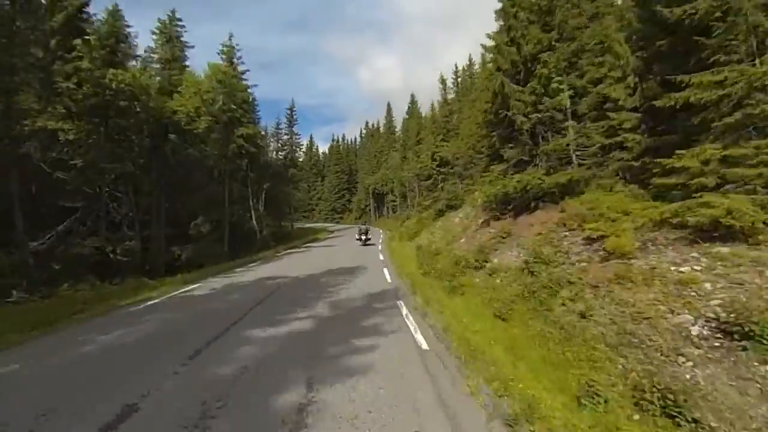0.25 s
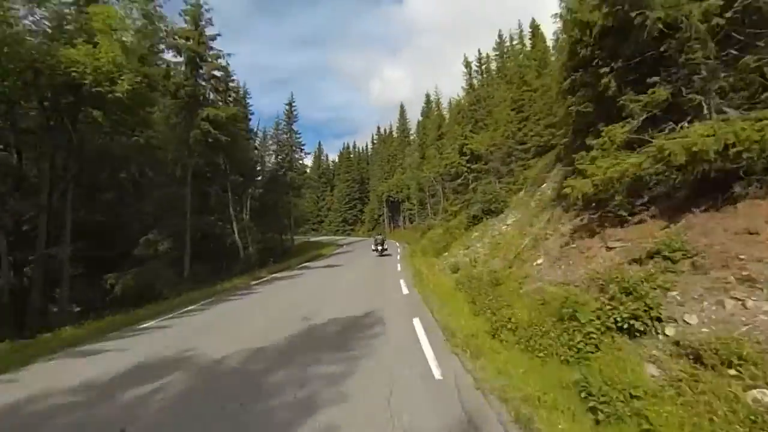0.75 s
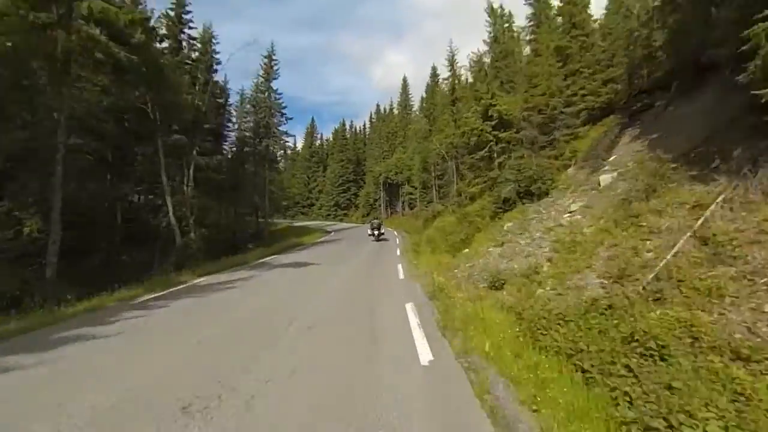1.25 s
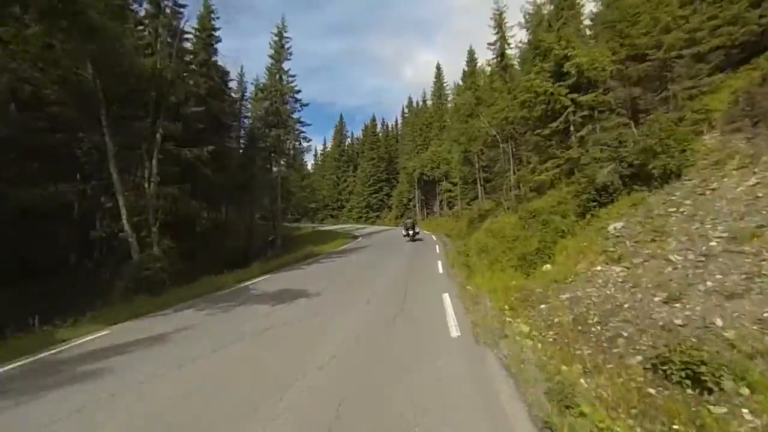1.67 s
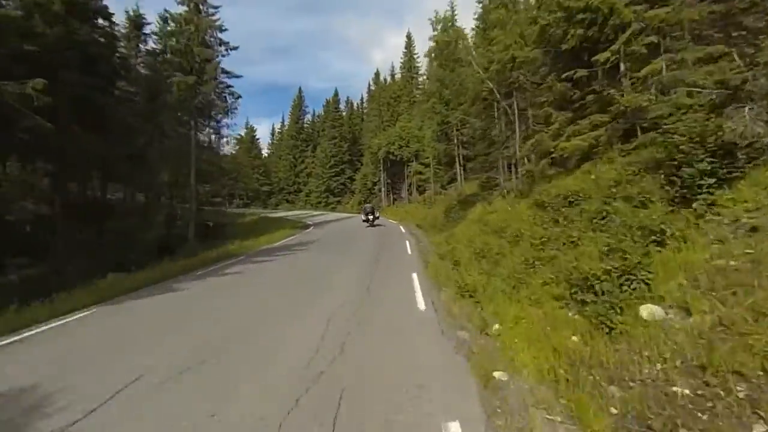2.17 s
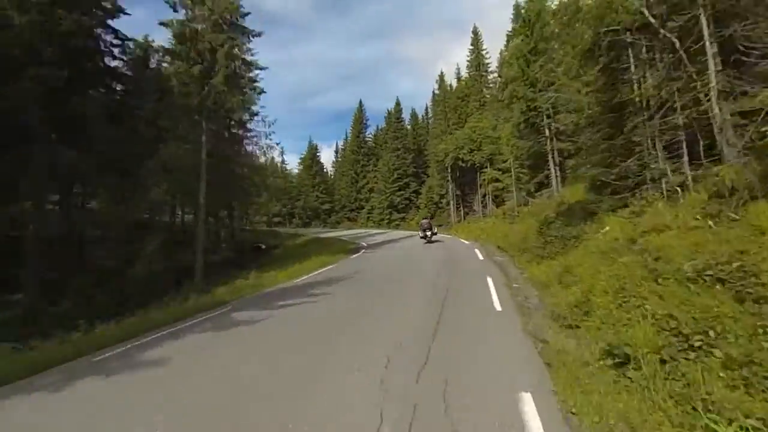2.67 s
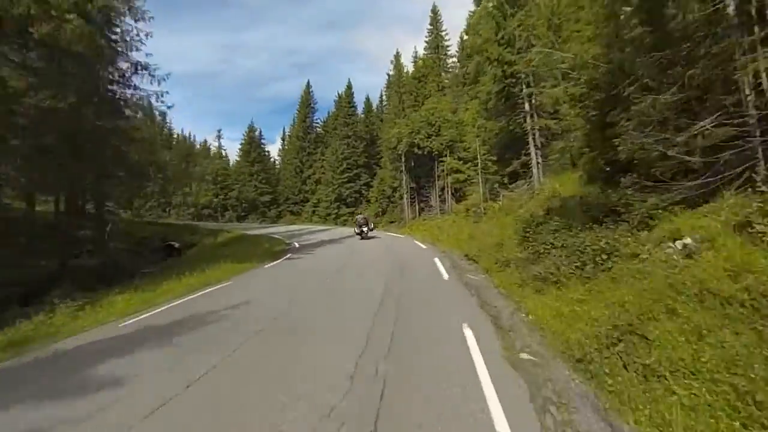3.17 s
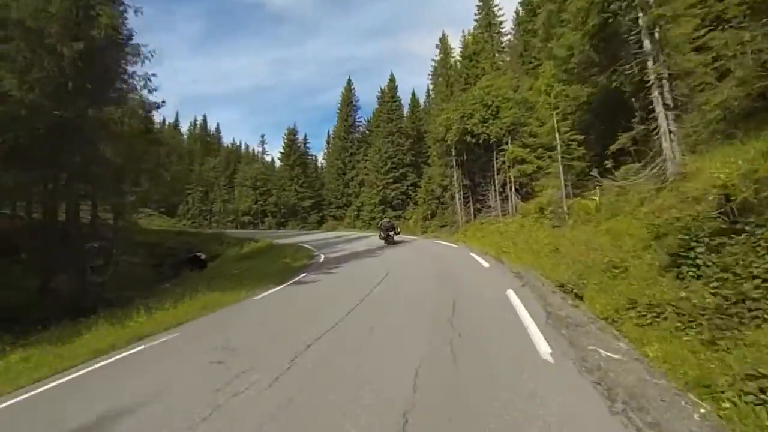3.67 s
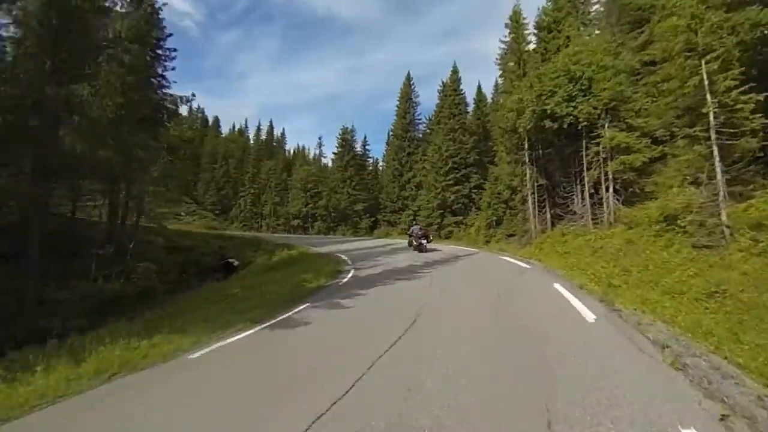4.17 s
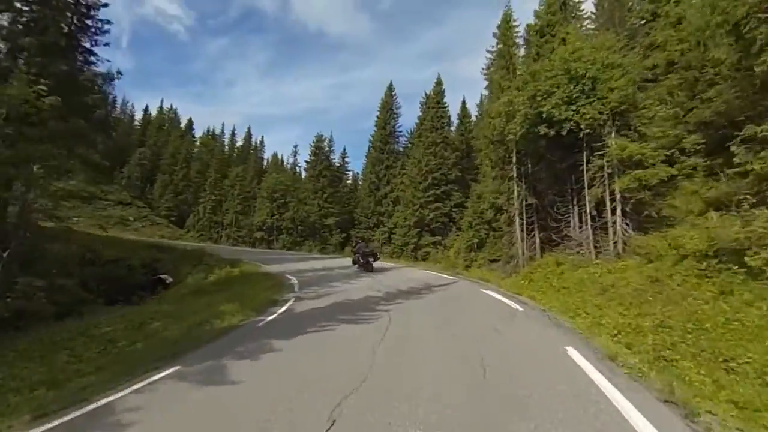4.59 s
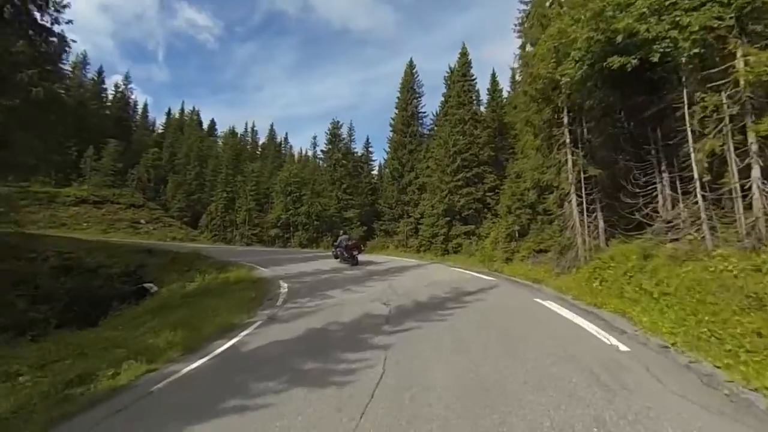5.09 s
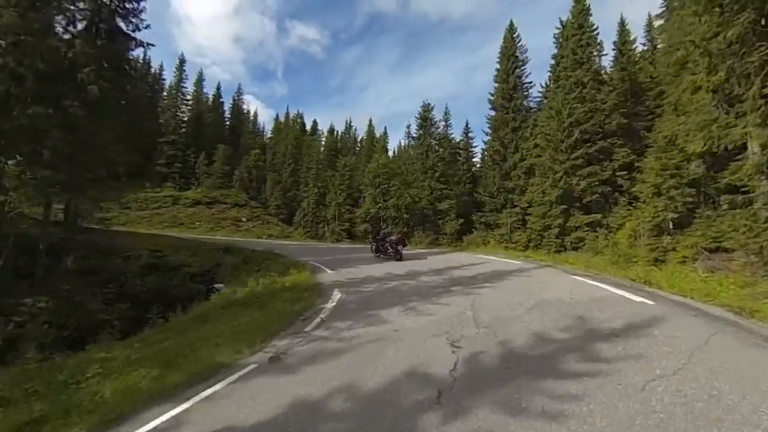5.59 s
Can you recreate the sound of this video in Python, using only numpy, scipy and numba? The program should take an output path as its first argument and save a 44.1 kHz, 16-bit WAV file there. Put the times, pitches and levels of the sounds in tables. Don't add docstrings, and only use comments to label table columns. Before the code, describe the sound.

Loud buffeting headwind on a moving motorcycle dies down over six seconds, leaving a falling engine drone, rough chain whine and faint hiss.

```python
import sys
import numpy as np
from scipy import signal
from scipy.fft import rfft, irfft
from scipy.io import wavfile
from scipy.ndimage import uniform_filter1d
from numba import njit

SR = 44100
rng = np.random.default_rng(int(sys.argv[2]) if len(sys.argv) > 2 else 0)


def voltage_ratio(decibels):
    exponent = np.asarray(decibels, float) / 20
    return 10 ** exponent


def wrap_up_sound(samples):
    columns = np.atleast_2d(samples).T
    tamed = np.clip(columns, -1, 1)
    steps = np.round(tamed * 32767).astype(np.int16)
    wavfile.write(sys.argv[1], SR, steps)


N = 257103
T = np.arange(N) / SR

# f/Hz, width/Hz, level/dB
CASE_PEAKS = [(741, 134, 6), (2383, 81, 5), (3040, 136, 6.5), (3490, 120, 4), (4770, 100, 3.5),
              (5150, 730, 3), (7500, 1300, 4.5)]


def level(x, db):
    return x * voltage_ratio(db) / np.sqrt(np.mean(x ** 2))


def curves(table):
    s, *columns = np.transpose(table)
    return [np.interp(T, s, column) for column in columns]


def walk(rate_hz):
    hold = int(SR / rate_hz)
    steps = np.repeat(rng.standard_normal(N // hold + 1), hold)
    slewed = uniform_filter1d(uniform_filter1d(steps, hold), hold)
    return 1.3 * slewed[:N]


def noise(spectrum, peaks=(), drive=1):
    hz = np.arange(N // 2 + 1) * SR / N + 1e-3
    points = np.array(spectrum)
    db = np.interp(np.log(hz), np.log(points[:, 0]), points[:, 1])
    for peak_hz, width_hz, peak_db in peaks:
        db = db + peak_db / (1 + (2 * (hz - peak_hz) / width_hz) ** 2)
    white = drive * rng.standard_normal(N)
    return level(irfft(rfft(white) * voltage_ratio(db), N), 0)


@njit
def svf(x, hz, width):
    out, band, low = np.empty(len(x)), 0., 0.
    for i in range(len(x)):
        g, k = np.tan(np.pi * hz[i] / SR), width / hz[i]
        v = (band + g * (x[i] - low)) / (1 + g * (g + k))
        band, low, out[i] = 2 * v - band, low + 2 * g * v, k * v
    return out


def resonate(x, hz, width_hz, db):
    width_hz = float(width_hz)
    return level(svf(svf(x, hz, width_hz), hz, width_hz), db)


def wind_buffet(eddy_db):
    # f/Hz, density/dB per Hz
    buffet_spectrum = [(8, -21), (30, 7), (55, -1), (70, -3.5), (100, -0.5), (210, -1.5), (280, -8),
                       (302, -20), (420, -26), (700, -87.5)]
    thumps = level(noise(buffet_spectrum), 2.65) * voltage_ratio(.5 * walk(6.1))
    return thumps * voltage_ratio(-25.5 + eddy_db)


def wind_stream(head_db):
    # f/Hz, density/dB per Hz
    roar_spectrum = [(200, -29.5), (320, -19.5), (500, -16.5), (1000, -18.5), (1350, -2), (1650, -12.5),
                     (2000, -16.5), (3700, -29.5), (4100, -34), (5800, -33), (6100, -40), (8000, -47.5),
                     (8600, -52.5), (14500, -61)]
    stream = level(noise(roar_spectrum, CASE_PEAKS, voltage_ratio(0.81 * walk(40))), 20.5)
    treble = svf(stream, np.full(N, 8500.), 5900.0)
    stream = stream + (voltage_ratio(6.0 - 3.1 * T) - 1) * treble
    calm_db = uniform_filter1d(head_db, size=SR // 4, mode="nearest")
    return stream * voltage_ratio(-51 + .98 * calm_db)


def wind_rush(head_db, cross):
    # f/Hz, density/dB per Hz
    rush_spectrum = [(900, -25.5), (1200, -6.5), (1700, -4.5), (2100, -8), (2600, -9), (2800, -15),
                     (3700, -15), (4100, -27.5), (5600, -34.5), (8000, -79)]
    rush = level(noise(rush_spectrum, CASE_PEAKS, voltage_ratio(1.24 * walk(45))), 0.91)
    return rush * np.hypot(voltage_ratio(-40 + 0.96 * head_db), cross)


def case_roar(head_db, cross):
    # f/Hz, width/Hz, level/dB
    air_modes = [(1351, 270, -3.5), (1580, 224, -9)]
    ring = 0
    for mode_hz, width_hz, db in air_modes:
        centre_hz = mode_hz * (1 + 0.01 * walk(4.09))
        mode = resonate(rng.standard_normal(N), centre_hz, width_hz, db)
        ring = ring + mode * voltage_ratio(1.13 * walk(30))
    head = voltage_ratio(-24.5 + head_db + 0.82 * walk(12))
    return ring * np.hypot(head, voltage_ratio(6.5) * cross)


def steady_hiss():
    # f/Hz, density/dB per Hz
    hiss_spectrum = [(200, -6.5), (320, -6), (500, -17.5), (950, -21), (1300, -24), (1800, -7), (2700, -37),
                     (3800, -30), (4200, -34.5), (5500, -52), (7200, -39), (9000, -42), (12000, -52.5),
                     (15000, -57)]
    return level(noise(hiss_spectrum, CASE_PEAKS), -52.0)


def engine():
    # t/s, rate/engine cycles per s
    cycle_rate = [(0, 34), (2.2, 27.3), (3, 23.8), (3.5, 21.8), (4, 20.5), (4.5, 19.8), (5, 18.9),
                  (5.83, 17.4)]
    # t/s, fourth order level/dB, sixth order level/dB
    order_levels = [(0, -59, -63), (1.8, -34, -54), (2.2, -36.5, -59), (2.9, -36, -67), (3.4, -47.5, -53.5),
                    (3.8, -47, -46), (4.2, -45.5, -42), (5, -44.5, -42), (5.83, -47, -42)]
    # order, level/dB over the fourth
    low_orders = [(2, -38), (3, -3), (4, -2.5), (5, -8)]
    # order, level/dB over the sixth
    high_orders = [(6, -0.5), (7, -12), (10, -19.5), (12, -18)]
    turn = 2 * np.pi * np.cumsum(curves(cycle_rate)[0]) / SR
    low_db, high_db = curves(order_levels)
    out = 0
    for orders, db in ((low_orders, low_db), (high_orders, high_db)):
        for order, rel_db in orders:
            start = 2 * np.pi * rng.random()
            gain = np.sqrt(2) * voltage_ratio(db + rel_db + 1.2 * walk(5.1))
            out = out + gain * np.sin(order * turn + start + .12 * walk(9))
    return out


def driveline_whine():
    # t/s, tooth rate f/Hz, level/dB
    tooth_rate = [(0, 820, -61), (2.4, 824, -50.5), (3.3, 819, -51), (3.75, 813, -44), (4, 792, -45),
                  (4.4, 730, -47.5), (5, 731, -47), (5.4, 672, -47), (5.83, 657, -49)]
    tooth_bands = [(2, 78, 0.5), (1.02, 53, -16.5)]
    hz, level_db = curves(tooth_rate)
    hz = hz * (1 + 0.0088 * walk(8.1))
    out = 0
    for multiple, width_hz, db in tooth_bands:
        band = resonate(rng.standard_normal(N), multiple * hz, width_hz, db)
        out = out + band * voltage_ratio(1.8 * walk(13))
    return voltage_ratio(level_db) * out


def mount_rocking(eddy_db):
    # t/s, level/dB
    jolts = [(.04, -38), (0.284, -17), (.61, -12), (.78, -21), (.89, -28.5), (.99, -26), (1.08, -22.5),
             (1.27, -24), (1.48, -21), (1.62, -23), (1.81, -23.5), (2.01, -22), (2.21, -27), (2.32, -26.5),
             (2.48, -27.5), (2.61, -27), (2.76, -25.5), (3.09, -34), (3.36, -39), (3.57, -42), (3.69, -33),
             (3.93, -34.5), (4.2, -38), (4.3, -39), (4.81, -43), (4.99, -42), (5.16, -37.5), (5.35, -37),
             (5.46, -42.5), (5.82, -32.5)]
    # f/Hz, density/dB per Hz
    heave_spectrum = [(2, 14), (8, 14.5), (14, 13.5), (25, 13), (45, 9), (80, -52.5)]
    rock_hz, swing_s, tremble_db = 47.2, .05, -33
    power = voltage_ratio(2 * (tremble_db + eddy_db))
    for s, db in jolts:
        power = power + voltage_ratio(2 * db) * np.exp(-((T - s) / swing_s) ** 2)
    swing = np.sqrt(power) * voltage_ratio(1.0 + 1.0 * walk(14))
    rock = np.sin(2 * np.pi * np.cumsum(rock_hz + walk(6) + 2 * walk(16)) / SR)
    return swing * rock + noise(heave_spectrum) * voltage_ratio(-31.5 - 1.17 * T)


def sensor_pips():
    # harmonic, on/period, off/period, level/dB
    pip_tones = [(1, .305, .69, -61), (2, .275, .66, -66.2)]
    pip_rate_hz, pip_hz = 48000 / 1001, 6449.6
    beat = T * pip_rate_hz
    start = 2 * np.pi * rng.random(N // 800)[beat.astype(int)]
    out = 0
    for harmonic, on, off, db in pip_tones:
        gate = uniform_filter1d(1. * (beat % 1 > on) * (beat % 1 < off), size=30)
        out = out + voltage_ratio(db) * gate * np.sin(harmonic * (2 * np.pi * pip_hz * T + start))
    return out


def side_gusts():
    # t/s, hold/s, level/dB
    gust_events = [
        (0.625, 0.06, -38),
        (1.237, 0.039, -53),
        (2.443, 0.095, -45),
        (2.77, 0.061, -49),
        (3.55, 0.1, -55.5),
        (3.816, 0.11, -51),
        (4.226, 0.073, -47.5),
        (5.291, 0.11, -48.5),
        (5.397, 0.055, -48.5),
        (5.702, .14, -48.5),
    ]
    rise_s, fall_s = 0.039, 0.07
    out = 0
    for s, hold_s, db in gust_events:
        rise = (T - s) / rise_s
        fall = 1 + (s + rise_s + hold_s - T) / fall_s
        shape = np.clip(np.minimum(rise, fall), 0, 1)
        out = np.maximum(out, voltage_ratio(db) * shape ** 0.92)
    return out


def grasshopper():
    # first stroke t/s, strokes, peak level/dB, wing f/Hz
    phrases = [(1.446, 1, -55.5, 11700), (1.479, 1, -52.5, 11900), (1.52, 2, -66, 11600),
               (1.62, 4, -66, 10300), (1.808, 1, -63, 10900), (1.89, 2, -63, 10300), (2.001, 4, -63, 10300),
               (2.183, 3, -64, 10400), (2.282, 1, -58, 11000), (2.329, 9, -63, 10400),
               (2.716, 4, -63, 10100), (2.87, 2, -68, 10300), (2.958, 3, -65, 10200), (3.13, 2, -65, 10200)]
    stroke_s, lengthening, wing_width_hz = .0372, .0022, 1300
    out = np.zeros(N)
    age = np.arange(SR // 16) / SR
    shape = (1 - np.exp(-age / .005)) * np.exp(-(age / .021) ** 2) * 1.25
    for first_s, count, peak_db, wing_hz in phrases:
        period_s = stroke_s + lengthening * (first_s - 2)
        for k in range(count):
            late, loud, sharp = rng.standard_normal(3)
            scrape = rng.standard_normal(len(age))
            s = first_s + k * period_s + .0015 * late
            db = peak_db + 1.2 * loud
            centre_hz = np.full(len(age), wing_hz * (1 + .015 * sharp))
            wing = resonate(scrape, centre_hz, wing_width_hz, db - 8)
            edge = resonate(scrape, 1.07 * centre_hz, 3000, 2 * db + 45.5)
            out[int((s - .004) * SR):][:len(age)] += (wing + edge) * shape
    return out


def scene():
    # t/s, head wind level/dB, turbulence level/dB
    air = [(0, 1.5, 2), (.14, -2.5, -5.5), (.25, 1, -0.5), (.6, -0.5, 1.5), (.85, -2, 0), (1, -4, -4.5),
           (1.15, -5.5, 0), (1.27, -2.5, -5), (1.4, -6, -3), (1.75, -8, -6), (2, -9, -9.5),
           (2.45, -11.5, -11), (2.7, -15, -14.5), (3.05, -17.5, -15.5), (3.45, -18, -17), (3.9, -19.5, -21),
           (4.5, -22.5, -21.5), (5.83, -23.5, -22)]
    head_db, eddy_db = curves(air)
    cross = side_gusts()
    wind = wind_buffet(eddy_db) + wind_stream(head_db)
    wind = wind + wind_rush(head_db, cross) + case_roar(head_db, cross)
    bike = engine() + driveline_whine() + mount_rocking(eddy_db)
    return (wind + steady_hiss() + bike + grasshopper())[None]


def band_limit(x):
    return signal.sosfilt(signal.butter(12, 14970, fs=SR, output="sos"), x)


def record(dry):
    rolloff = signal.butter(3, 14300, fs=SR, output="sos")
    mix = signal.sosfilt(rolloff, dry + sensor_pips())
    return band_limit(mix)


dry = scene()
out = record(dry)
wrap_up_sound(out)
```